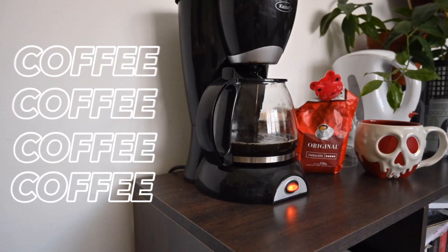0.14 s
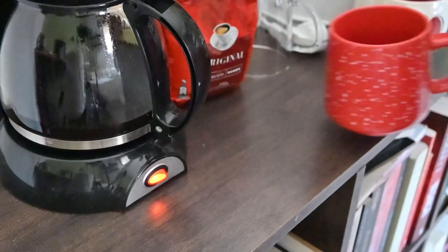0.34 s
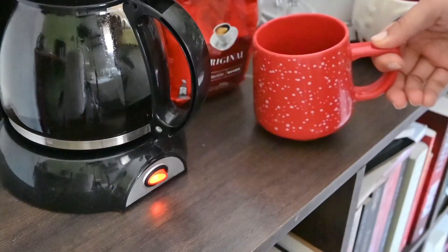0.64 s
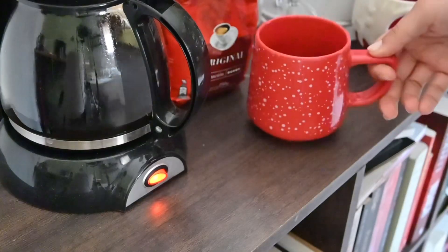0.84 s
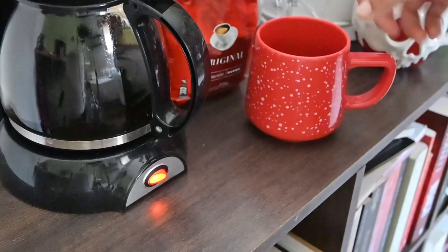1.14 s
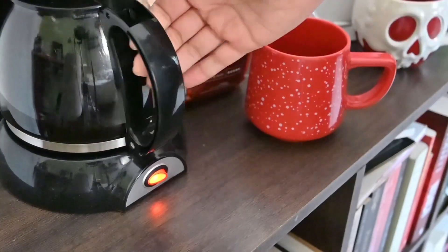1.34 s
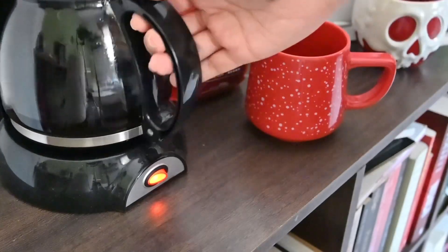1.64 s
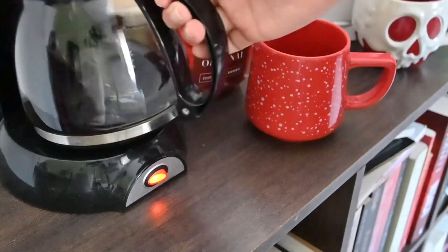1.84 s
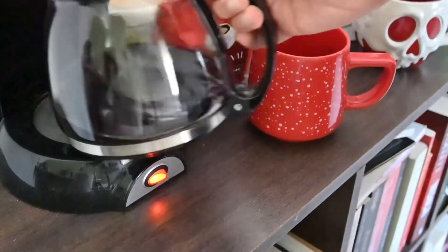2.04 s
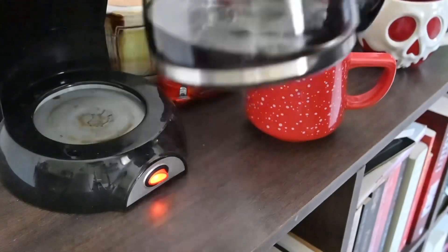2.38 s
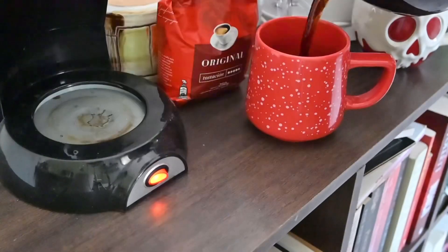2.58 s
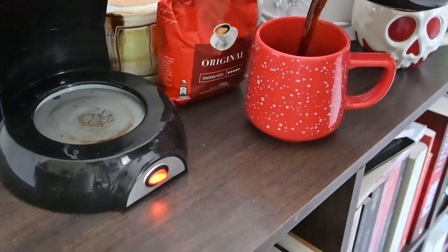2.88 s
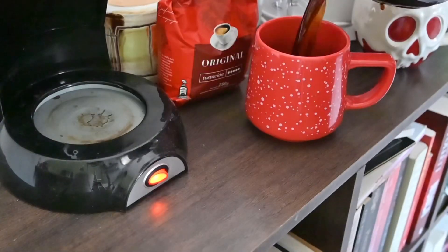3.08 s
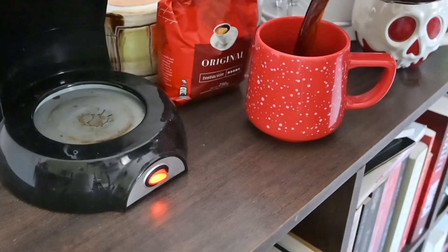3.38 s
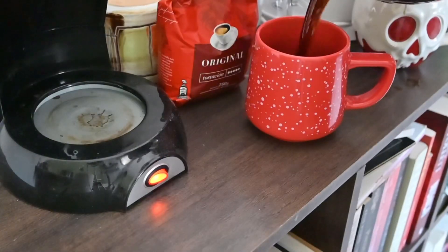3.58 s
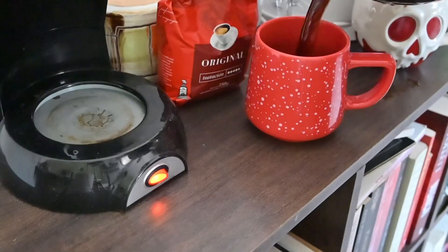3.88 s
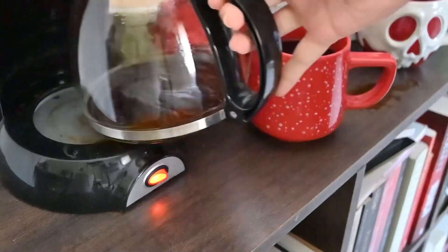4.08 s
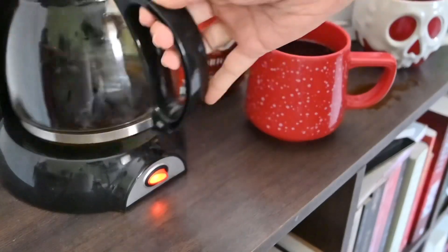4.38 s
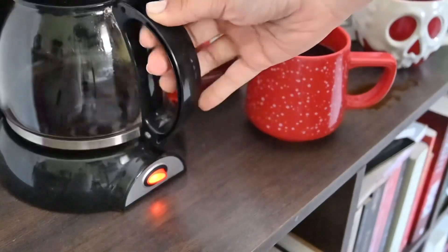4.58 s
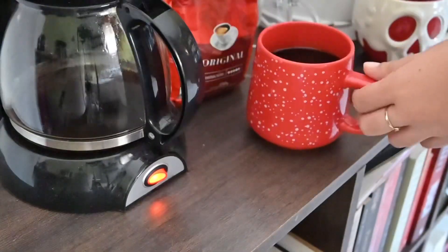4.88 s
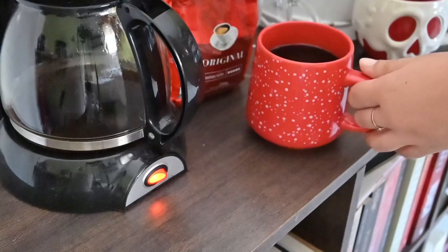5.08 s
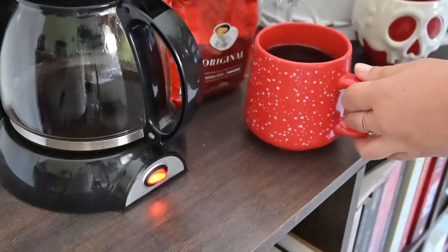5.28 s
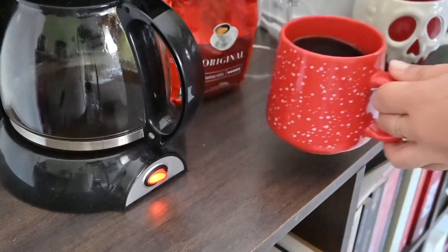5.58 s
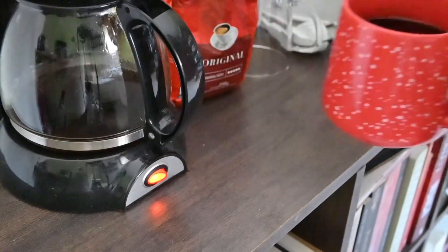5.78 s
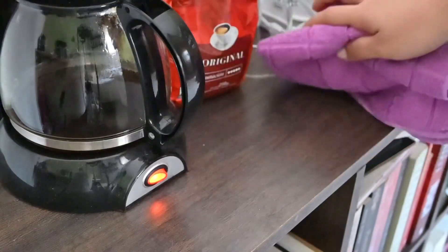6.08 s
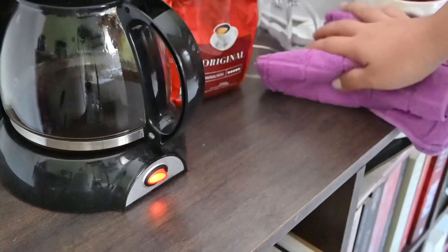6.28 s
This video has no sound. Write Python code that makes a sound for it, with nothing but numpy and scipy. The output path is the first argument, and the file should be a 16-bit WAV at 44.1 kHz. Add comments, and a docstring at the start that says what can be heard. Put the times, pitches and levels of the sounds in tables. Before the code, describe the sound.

A ceramic mug thuds onto a wooden cabinet, a glass carafe scrapes free, coffee gurgles into the mug, then the carafe clatters back in a small room.

```python
"""Over a small room's steady rumble (shaped noise), a mug lands on a wooden cabinet (damped modes) and rocks flat.
A coffee maker's glass carafe knocks its plastic housing and judders off the hot plate (stick-slip note, grit).
It pours into the mug (chirping bubbles, spray, air-cavity gulps) and clatters back (housing and glass modes).
Mug and cloth rub the wood in short strokes (filtered impulses) and the cabinet rumbles under the hand.
Echoes of a small room follow every source except the two rumbles."""
import sys
import numpy as np
from scipy import signal
from scipy.fft import rfft, irfft, next_fast_len
from scipy.io import wavfile
from scipy.ndimage import uniform_filter1d, map_coordinates

SR = 44100
rng = np.random.default_rng(int(sys.argv[2]) if len(sys.argv) > 2 else 0)


def bounce(signal):
    """Save signal as a 16-bit WAV file at the path given by the first command-line argument."""
    frames = np.transpose(np.atleast_2d(signal))
    limited = np.clip(frames, -1, 1)
    pcm = np.round(limited * 32767).astype(np.int16)
    wavfile.write(sys.argv[1], SR, pcm)


N = 283563  # length in samples
AGE = np.arange(SR // 2) / SR  # time since a blow (s)


def amp(db):
    """Level law: decibels to amplitude gain."""
    return 10 ** (np.asarray(db) / 20)


def unit(x):
    """Mean power: scale to rms 1."""
    return x / np.sqrt(np.mean(x ** 2) + 1e-20)


def crest(x):
    """Short-time power: scale so that the loudest 4 ms have rms 1."""
    return x / np.sqrt(uniform_filter1d(x ** 2, size=176).max() + 1e-20)


def along(points, hz):
    """Logarithmic frequency scale: interpolate (Hz, value) points."""
    f, v = np.transpose(points)
    return np.interp(np.log(hz + 1), np.log(f + 1), v)


def wobble(rate):
    """Slow random modulation: a smooth curve through `rate` random knots a second."""
    knots = rng.standard_normal(int(N * rate / SR) + 4)
    return map_coordinates(knots, [np.arange(N) * rate / SR])


def colour(x, spectrum):
    """Linear filtering: multiply the spectrum by a gain curve of (Hz, dB) points."""
    m = next_fast_len(x.shape[-1] + 8192)
    gain = amp(along(spectrum, np.fft.rfftfreq(m, 1 / SR)))
    return irfft(rfft(x, m) * gain, m)[..., :x.shape[-1]]


def band(x, lo_hz, hi_hz, order=3):
    """Band limitation: a causal Butterworth band-pass."""
    edges = [lo_hz, min(hi_hz, SR / 2 - 100)]
    return signal.sosfilt(signal.butter(order, edges, 'band', fs=SR, output='sos'), x)


def add(track, s, sound):
    """Superposition: mix a sound into a track at time s."""
    part = track[..., max(round(s * SR), 0):][..., :sound.shape[-1]]
    part += sound[..., :part.shape[-1]]


def fade(t60):
    """Exponential decay: 60 dB down after t60 seconds."""
    return np.exp(-np.log(1000) * AGE / t60)


def ring(modes):
    """Modal synthesis: a sum of damped sines from (Hz, dB, t60) rows."""
    return sum(amp(db) * fade(t60) * np.sin(2 * np.pi * hz * AGE) for hz, db, t60 in modes)


def swell(s, length, attack, release):
    """Envelope: a squared ramp reaches 1 at time s, holds, then decays with time constant `release`."""
    t = np.arange(N) / SR - s
    rise = np.clip(1 + t / attack, 0, 1) ** 2
    return rise * np.exp(-np.clip((t - length) / release, 0, 20))


def grit(rate, scatter_db):
    """Surface roughness: random tiny impulses of uneven size, rms 1."""
    hits = rng.random(N) < rate / SR
    sizes = amp(scatter_db * np.minimum(rng.standard_normal(N), 2))
    return unit(hits * rng.choice([-1, 1], N) * sizes)


def spread(pair):
    """Spatial coherence: two unrelated signals become left and right, alike in the bass."""
    side = band(pair[1], lo_hz=1730, hi_hz=20600)
    return np.array([pair[0] + side, pair[0] - side])


AIR_START_S, AIR_DB = .214, -49.5
# Spectrum of the room's rumble and hiss. Each row: frequency in Hz, relative density in dB per Hz.
AIR_SPECTRUM = [(20, -22), (36, -10), (54, 0.5), (78, -12), (100, 0), (132, 2.5), (165, -4), (260, -3.5),
                (400, -11), (650, -15), (1050, -22.5), (2500, -28), (8000, -39), (16000, -33)]


def air():
    """Shaped noise: the room's steady rumble and faint hiss."""
    begun = np.arange(N) / SR > AIR_START_S
    noise = colour(rng.standard_normal((2, N)), AIR_SPECTRUM)
    return amp(AIR_DB) * begun * unit(spread(noise))


# Reverberation of the room. Each row: frequency in Hz, t60 in seconds.
ROOM_T60 = [(120, 0.252), (320, 0.27), (840, 0.26), (2200, 0.32), (6000, 0.27), (15000, 0.22)]
# Colour of the reverberant tail. Each row: frequency in Hz, gain in dB.
TAIL_COLOUR = [(100, -7), (280, -1.5), (500, 1.5), (1200, 1), (3000, -3), (8000, -0.5), (15000, 0)]


def in_room(x, wet_db, near_db):
    """Convolution with a room response: direct sound, scatter from things close by, and a decaying tail."""
    hz, t, z = signal.stft(rng.standard_normal((2, len(AGE))), SR, nperseg=256)
    decay_db = along(TAIL_COLOUR, hz)[:, None] - 60 * t / along(ROOM_T60, hz)[:, None]
    tail = signal.istft(z * amp(decay_db), SR, nperseg=256)[1][:, :len(AGE)]
    tail = spread(tail * (1 - fade(0.029)))  # the tail builds up behind the direct sound
    near = band(rng.standard_normal((2, len(AGE))), 467, 12000, order=2)
    near = spread(near * fade(0.034))
    answer = amp(wet_db) * tail / np.linalg.norm(tail[0])
    answer += amp(near_db) * near / np.linalg.norm(near[0])
    # a brief scatter in the treble differs between left and right
    scatter = rng.standard_normal(len(AGE)) * fade(0.0014)
    answer += spread([AGE == 0, amp(-15.5) * scatter / np.linalg.norm(scatter)])
    return signal.fftconvolve(x[None], answer, axes=1)[:, :N]


# Strokes over the wood. Each row: time of full pressure in seconds, length in seconds, scrape level in dB.
RUB_STROKES = [(0.68, 0.38, -59.5), (4.569, .01, -53.5), (4.693, 0.014, -55), (5.006, .02, -63.5),
               (5.129, 0.019, -55), (5.29, 0.045, -56), (5.63, 0.017, -65), (5.91, 0.052, -67.5),
               (6.307, 0.017, -52)]
STROKE_ATTACK_S, STROKE_RELEASE_S = 0.033, 0.033
STROKE_BODY_DB = 6.5  # the wood's hum, over the scrape
GRIP_S, GRIP_LENGTH_S, GRIP_DB = 4.75, 0.104, -45.5  # the cabinet rumbles under the hand
# Spectrum of the scrape on wood. Each row: frequency in Hz, relative density in dB per Hz.
WOOD_SCRAPE = [(290, -2), (500, -3), (811, 3), (1300, 0.5), (1580, -5.5), (3410, -9), (4350, -15),
               (5090, -21.5), (15000, -32.5)]


def sliding():
    """Friction noise: mug and cloth drag over the wood's grain, and the hand makes the cabinet rumble."""
    pressure = sum(amp(db) * swell(s, length, STROKE_ATTACK_S, STROKE_RELEASE_S)
                   for s, length, db in RUB_STROKES)
    grain = grit(1400, scatter_db=8.5)
    hum = amp(STROKE_BODY_DB) * unit(band(grain, 229, 334, order=2))
    rub = hum + unit(colour(grain, WOOD_SCRAPE))
    rumble = amp(GRIP_DB) * unit(band(rng.standard_normal(N), 44, 178))
    rumble = rumble * swell(GRIP_S, GRIP_LENGTH_S, attack=0.084, release=0.066)
    return in_room(pressure * rub, wet_db=-2, near_db=4.5) + rumble


def thump(modes):
    """Radiation efficiency: a wooden or plastic body rings, too small to radiate deep bass."""
    return crest(band(ring(modes) * (1 - fade(0.022)), lo_hz=126, hi_hz=2990, order=2))


def contact(crowds, hardness, t60, snap):
    """Impact excitation: a sharp push excites crowds of short modes; hardness tilts them about 1500 Hz."""
    out = 0
    for lo, hi, db, life in crowds:
        force = rng.standard_normal(len(AGE)) * fade(t60 * life)
        force[0] += snap
        octaves = np.log2(np.sqrt(lo * hi) / 1500)
        out = out + amp(db + hardness * octaves) * crest(band(force, lo, hi))
    return out


# The mug's base meets the cabinet. Each row: start in seconds, contact level in dB,
# hardness in dB per octave, rattle t60 in seconds, thud level in dB.
MUG_CONTACTS = [(0.5386, -24.5, -1, 0.03, -16), (.5439, -36.5, -12, 0.034, -9),
                (.607, -43.5, -1.5, 0.19, -19), (.888, -19.5, -4, .03, -40),
                (0.8933, -31.5, -5, 0.087, -15)]
BOOM_T60_S = 0.25  # scaled by each cabinet mode's share
# Modes of the cabinet top. Each row: frequency in Hz, level in dB, share of the boom's t60.
CABINET_MODES = [(150.6, -18.5, 2.3), (184.3, -17, 2.65), (272, 3.5, 0.82), (299.5, 8.5, 0.46),
                 (330.3, -0.5, 0.69), (388, -1.5, 0.61), (506, -7, 0.63)]
# Crowds of short modes in wood. Each row: low and high edge in Hz, level in dB, share of the rattle t60.
WOOD_CROWDS = [(390, 1060, 3, 1.1), (1115, 2160, 0, 0.76), (2300, 4130, -6, 0.83), (5200, 23000, -12, 0.65)]
# Modes of the ceramic wall. Each row: frequency in Hz, level in dB, t60 in seconds.
CERAMIC_MODES = [(1480, -47, .35), (8231, -55, .46), (12900, -67, .7)]
# Modes of a tapped rim. Each row: frequency in Hz, level in dB, t60 in seconds.
RIM_MODES = [(513, 0.5, 0.12), (933, -7.5, 0.03), (1220, -7.5, 0.055), (1910, -14.5, 0.017)]
# Times in seconds of the ever quicker taps as the mug rocks flat.
ROCKING_S = .898 + .075 * (1 - .89 ** np.arange(10))


def mug():
    """Modal impact: the base lands on one edge, then rocks flat; the cabinet booms and the ceramic rings."""
    out, taps = np.zeros((2, N)), np.zeros(N)
    boom = thump([(hz, db, BOOM_T60_S * life) for hz, db, life in CABINET_MODES])
    for s, db, hardness, rattle_t60, thud_db in MUG_CONTACTS:
        rattle = contact(WOOD_CROWDS, hardness, rattle_t60, snap=5.6)
        blow = amp(thud_db) * boom + amp(db) * rattle
        add(out, s, in_room(blow, wet_db=-2.5, near_db=-1.5))
    add(out, MUG_CONTACTS[0][0], in_room(ring(CERAMIC_MODES), wet_db=-13, near_db=-20))
    for k, s in enumerate(ROCKING_S):  # the taps weaken on average
        tap_db = -18.0 - 1.1 * k + rng.normal(0, 0.98)
        add(taps, s + rng.normal(0, 0.00027), amp(tap_db) * ring(RIM_MODES))
    return out + in_room(taps, wet_db=-8.5, near_db=-12)


def bubble(hz, cycles, rise):
    """Bubble resonance: a damped chirp, its pitch rising as the bubble nears the surface."""
    u = np.arange(int(SR * cycles / hz)) * hz / SR / cycles  # 0 to 1 over the bubble's life
    tone = np.sin(2 * np.pi * cycles * (u + rise * (u * u / 2 - u / 4)))
    return tone * np.exp(-5 * u) * (1 - np.exp(-25 * u)) * 2


POUR_START_S, POUR_END_S = 2.45, 4.01


def froth(count, low_hz, high_hz, cycles, rise, range_db):
    """Statistical superposition: random bubbles through the pour, many weak and a few strong, rms 1."""
    out = np.zeros(N)
    for when, size, strength in rng.random((count, 3)):
        s = POUR_START_S + when * (POUR_END_S - POUR_START_S)
        hz = low_hz * (high_hz / low_hz) ** size
        add(out, s, amp(range_db * strength ** 2) * bubble(hz, cycles, rise))
    return out / np.std(out[int(POUR_START_S * SR):int(POUR_END_S * SR)])


# Resonance of the air in the filling mug. Each row: time in seconds, frequency in Hz.
CAVITY_PITCH = [(2.42, 847), (3.2, 863), (3.5, 957), (4.01, 943)]


def cavity_hz(s):
    """Cavity resonance: pitch of the air in the mug at time s."""
    return np.interp(s, *np.transpose(CAVITY_PITCH))


# Big bubbles that sound the air in the mug. Each row: start in seconds, level in dB.
GULP_BUBBLES = [(2.616, -42), (2.716, -36), (2.833, -34), (2.866, -36), (2.928, -41.5), (3.182, -33),
                (3.509, -30.5), (3.84, -29.5), (3.857, -33.5)]
# The brightest small bubbles. Each row: start in seconds, level in dB, frequency in Hz.
BRIGHT_PLINKS = [(2.455, -39.5, 2540), (2.503, -38, 2570), (2.5125, -34, 2770), (2.565, -41.5, 2100),
                 (2.5822, -33, 3260), (2.597, -37.5, 2600), (2.8214, -38.5, 2690), (2.9553, -38, 2620),
                 (3.114, -41.5, 4300), (3.2015, -39, 1740), (3.211, -29.5, 4920), (3.226, -37, 4650),
                 (3.311, -42.5, 2690), (3.377, -38, 2920), (3.3985, -34.5, 2700), (3.555, -36, 2820),
                 (3.708, -33, 3900), (3.895, -36, 3000)]
# Fainter plinks ring at random near the second air mode, a multiple of the first.
PLINK_DB, PLINK_OVER_CAVITY = -51, 3.16
# The loudest bursting droplets. Each row: start in seconds, level in dB.
DROPLET_BURSTS = [(2.5117, -43), (2.7748, -41), (2.8324, -43), (2.8467, -43.5), (2.9217, -52),
                  (3.3313, -46.5), (3.3765, -46.5), (3.7883, -39), (3.8327, -29.5)]


def drops():
    """Transient resonance: single gulps, plinks and bursting droplets stand out from the stream."""
    out = np.zeros(N)
    for s, db in GULP_BUBBLES:
        add(out, s, amp(db) * bubble(cavity_hz(s), cycles=21.6, rise=0.043))
    for s, db, hz in BRIGHT_PLINKS:
        add(out, s, amp(db) * bubble(hz, cycles=29.5, rise=0.036))
    for s in rng.uniform(POUR_START_S, POUR_END_S, size=36):
        hz = PLINK_OVER_CAVITY * cavity_hz(s) * np.exp(rng.normal(0, .05))
        add(out, s, amp(PLINK_DB + rng.normal(0, 2.5)) * bubble(hz, cycles=26.6, rise=0.048))
    for s, db in DROPLET_BURSTS:
        burst = rng.standard_normal(len(AGE)) * fade(.004)
        add(out, s, amp(db) * crest(band(burst, 7900, 15500, order=2)))
    return out


# Steady levels, before each layer's own trim in pouring().
BUBBLES_DB, GURGLE_DB, SPRAY_DB = -58, -56.5, -68
# Surges of the stream. Each row: peak time in seconds, then bubble and spray level in dB before the trims.
STREAM_SURGES = [(2.51, -59.5, -47.5), (2.588, -49, -50.5), (2.774, -60, -49.5), (2.851, -48, -42.5),
                 (2.935, -40, -46), (3.06, -50, -50.5), (3.151, -48.5, -45.5), (3.2, -41.5, -46),
                 (3.3, -46.5, -64), (3.509, -48.5, -69), (3.71, -47, -65), (3.785, -45, -54),
                 (3.844, -42.5, -43.5), (3.92, -55.5, -70)]
SURGE_ATTACK_S, SURGE_RELEASE_S = 0.044, 0.0201
# The churning round each gulp, relative to the gulp and before the trim.
GURGLE_AFTER_DB, GURGLE_ATTACK_S, GURGLE_RELEASE_S = -6, 0.018, 0.027
# Colour of the bubbles. Each row: frequency in Hz, gain in dB.
BUBBLE_COLOUR = [(1100, -7), (1500, -2.5), (1800, -1), (2300, -1.5), (2850, 8.5), (3500, 1), (4700, 2.5),
                 (6000, -6), (9000, -28)]
# Colour of the stream's plunge. Each row: frequency in Hz, gain in dB.
WASH_COLOUR = [(700, -13), (1000, -5), (1400, -28), (2200, -40), (2850, 29), (3500, 16.5), (4700, 16.5),
               (6000, -17), (9000, -1), (16000, 14)]
# Colour of the spray. Each row: frequency in Hz, gain in dB.
SPRAY_COLOUR = [(3500, -8), (5500, -9), (8500, -2.5), (11000, -3.5), (16000, 3.5)]


def pouring():
    """Bubble acoustics: a soft wash plunges, surges stir up bubbles and spray, and gulps set the mug gurgling."""
    flow = swell(POUR_START_S, POUR_END_S - POUR_START_S, attack=0.029, release=0.0059)
    bubbling, spraying, churning = amp(BUBBLES_DB) * flow, amp(SPRAY_DB) * flow, amp(GURGLE_DB) * flow
    for s, bubbles_db, spray_db in STREAM_SURGES:
        surge = swell(s, 0, SURGE_ATTACK_S, SURGE_RELEASE_S)
        bubbling = bubbling + amp(bubbles_db) * surge
        spraying = spraying + amp(spray_db) * surge
    for s, db in GULP_BUBBLES:
        churn = swell(s, 0, GURGLE_ATTACK_S, GURGLE_RELEASE_S)
        churning = churning + amp(db + GURGLE_AFTER_DB) * churn

    gurgle = np.zeros(N)
    for s in rng.uniform(POUR_START_S, POUR_END_S, size=260):
        hz = cavity_hz(s) * (0.884 + 0.5 * rng.random() ** 2)
        add(gurgle, s, amp(rng.normal(0, 1.6)) * bubble(hz, cycles=33, rise=0.052))
    chirps = froth(count=700, low_hz=1150, high_hz=6500, cycles=38, rise=.24, range_db=22)
    spray = froth(count=3200, low_hz=4200, high_hz=15700, cycles=26, rise=0.042, range_db=32)
    wash = colour(grit(3000, scatter_db=3), WASH_COLOUR)

    plunge = amp(-11.5) * unit(colour(chirps, BUBBLE_COLOUR)) + amp(-8.5) * unit(wash)
    stream = bubbling * plunge
    stream += churning * amp(-16.5) * unit(gurgle)
    stream += spraying * amp(-9.0) * unit(colour(spray, SPRAY_COLOUR))
    return in_room(drops() + stream, wet_db=-2.5, near_db=-0.5)


DRAG_START_S, DRAG_LENGTH_S, DRAG_ATTACK_S, DRAG_RELEASE_S = 1.606, 0.41, 0.085, 0.058
JUDDER_DB, SCRAPE_DB = -39.5, -57.5  # before shoves and wobble
SCRAPE_FOLLOWS = 0.47  # the scrape gains this share of a shove's dB
# Changes in the hand's pull. Each row: time in seconds, extra level in dB, half-width (to 1/e) in seconds.
HAND_SHOVES = [(1.633, 9, 0.0092), (1.84, -4, 0.013), (2.002, 14.5, 0.029)]
# Stick-slip rate. Each row: time in seconds, slips a second.
SLIP_RATE = [(1.55, 410), (1.63, 340), (1.68, 324), (1.77, 316), (1.95, 345), (2.0, 358), (2.14, 417)]
# Spectrum of glass scraping the hot plate. Each row: frequency in Hz, relative density in dB per Hz.
PLATE_SCRAPE = [(350, -26), (600, 3), (1420, -1), (2070, -1), (2640, -4), (3140, -7), (3900, -6),
                (4700, -17), (7200, -21.5), (15000, -37)]


def dragging():
    """Stick-slip friction: the carafe judders over a dry scrape; a strong shove locks it into a clean note."""
    t = np.arange(N) / SR
    shove_db = sum(db * np.exp(-((t - s) / width) ** 2) for s, db, width in HAND_SHOVES)
    slip_hz = np.interp(t, *np.transpose(SLIP_RATE))
    loose = np.clip(.55 - 0.036 * shove_db, .01, 1)  # power share of the irregular stutter
    note = np.sin(2 * np.pi * np.cumsum(slip_hz * (1 + 0.0135 * wobble(60))) / SR)
    stutter = band(grit(400, scatter_db=3.5), lo_hz=267, hi_hz=384, order=2)
    judder = np.sqrt(1 - loose) * unit(note) + np.sqrt(loose) * unit(stutter)
    judder = amp(JUDDER_DB + shove_db + 1.15 * wobble(34.44)) * judder
    scrape_db = SCRAPE_DB + SCRAPE_FOLLOWS * shove_db + 1.4 * wobble(68) + 2.8 * wobble(14)
    scrape = amp(scrape_db) * unit(colour(grit(550, scatter_db=2.5), PLATE_SCRAPE))
    moving = swell(DRAG_START_S, DRAG_LENGTH_S, DRAG_ATTACK_S, DRAG_RELEASE_S)
    return in_room((judder + scrape) * moving, wet_db=-10, near_db=-1.5)


# Knocks on carafe, housing and cabinet. Each row: start in seconds, contact level in dB,
# hardness in dB per octave, thud pitch in Hz, thud level in dB before a common 4 dB cut.
CARAFE_KNOCKS = [(1.287, -27.5, 0.5, 237, -20.5), (1.586, -44, -4, 317, -35),
                 (1.6284, -40.5, -4.5, 359, -34), (1.6802, -46, -4.5, 272, -32),
                 (1.7849, -46, -6, 279, -32), (1.7992, -37, -3, 380, -35), (1.835, -26.5, -1.5, 373, -26.5),
                 (1.9954, -43.5, 2.5, 350, -32), (2.2057, -16, 0.5, 256.8, -5), (2.2562, -26, -1, 267, -28),
                 (2.2642, -24.5, -1, 220, -24.5), (4.0167, -24, 1.5, 307, -20),
                 (4.0275, -26, 1, 352, -26.5), (4.0488, -35, -2.5, 289, -22.5),
                 (4.0638, -29, -0.5, 315, -27), (4.1893, -38, -4, 361, -45), (4.2175, -26.5, 3, 296.5, -15),
                 (4.2478, -30, -2, 298.6, -14.5), (4.312, -26, -3, 255, -20.5),
                 (4.3699, -23.5, 0.9, 267, -23), (4.4024, -20, -1, 349.6, -16.5),
                 (4.4153, -16, -0.5, 244.5, -13), (4.433, -20, -1, 272, -8.5),
                 (4.4664, -39.5, 1.5, 277.7, -16), (6.297, -37, 0.5, 241.6, -41.5)]
THUD_T60_S, RATTLE_T60_S = 0.12, .036  # scaled by each mode's or crowd's share
# Contacts above this level lift the housing's upper modes, lighter ones mute them (dB per dB and octave).
HEAVY_DB, OVERTONES_GROW = -25, 1
# Modes of the hollow housing. Each row: multiple of the thud pitch, level in dB, share of the thud t60.
HOUSING_MODES = [(.5, -19, 3), (.72, -10.5, 1.04), (1.002, 3, 0.66), (1.31, -6.5, 0.85),
                 (1.62, -17.5, 0.84), (1.96, -15, 0.85)]
# Crowds of short modes in plastic. Each row: low and high edge in Hz, level in dB, share of the rattle t60.
PLASTIC_CROWDS = [(380, 895, -2, 1.12), (1032, 2110, -5, 0.74), (2520, 4630, -6, 0.48),
                  (5200, 17500, -13.5, .6)]
# Knocks that ring the glass. Each row: start in seconds, level in dB, pitch in Hz favoured by the spot hit.
GLASS_CLINKS = [(1.835, -21, 1200), (2.203, -10.5, 2500), (4.0155, -29.5, 3200), (4.218, -29.5, 3500),
                (4.3683, -21, 3230), (4.416, -3.5, 1550), (6.297, -31, 2200)]
SPOT_DB_PER_OCTAVE = 17.5  # how fast modes weaken away from the favoured pitch
# Modes of the carafe's glass. Each row: frequency in Hz, level in dB, t60 in seconds.
GLASS_MODES = [(1344, -7.5, .044), (1403, -4, 0.02), (2486, -7.5, 0.026), (3222, 3, 0.02), (3640, 8, 0.012)]


def carafe():
    """Modal impact: knocks thump the hollow housing, heavy ones with more overtones; some ring the glass."""
    out = np.zeros((2, N))
    for s, db, hardness, hz, thud_db in CARAFE_KNOCKS:
        lift = OVERTONES_GROW * max(db - HEAVY_DB, -12)
        thud = thump([(hz * k, level + lift * max(np.log2(k), 0), THUD_T60_S * life)
                      for k, level, life in HOUSING_MODES])
        rattle = contact(PLASTIC_CROWDS, hardness, RATTLE_T60_S, snap=8.8)
        blow = amp(thud_db - 4.0) * thud + amp(db) * rattle
        add(out, s, in_room(blow, wet_db=-1.5, near_db=-3.0))
    for s, db, spot_hz in GLASS_CLINKS:
        glass = ring([(hz, level - SPOT_DB_PER_OCTAVE * abs(np.log2(hz / spot_hz)), t60)
                      for hz, level, t60 in GLASS_MODES])
        clink = amp(db) * glass * (1 - fade(0.0043))  # softened onset
        add(out, s, in_room(clink, wet_db=-5, near_db=-0.5))
    return out


def scene():
    """Superposition: the room's rumble and everything on the cabinet."""
    return air() + sliding() + mug() + pouring() + dragging() + carafe()


TOP_HZ = 16300  # upper band limit
PORT_LAG_S = .000009  # the sound reaches the left port a little sooner
# Microphone colour. Each row: frequency in Hz, gain in dB.
MIC_COLOUR = [(100, 0.5), (500, .5), (800, -0.5), (1300, 1), (3000, -0.5), (4000, -3), (5100, 0.5),
              (6300, 1.5), (8500, -2.5), (12000, -6.5)]


def record(dry):
    """Linear transduction: microphone colour, a lag between two ports and a sharp upper band limit."""
    m = next_fast_len(N + 8192)
    hz = np.fft.rfftfreq(m, 1 / SR)
    lag = np.exp(1j * np.pi * PORT_LAG_S * np.array([hz, -hz]))  # half the lag each way
    response = amp(along(MIC_COLOUR, hz)) * lag * (hz < TOP_HZ)
    return irfft(rfft(dry, m) * response, m)[:, :N]


dry = scene()
out = record(dry)
bounce(out)
```